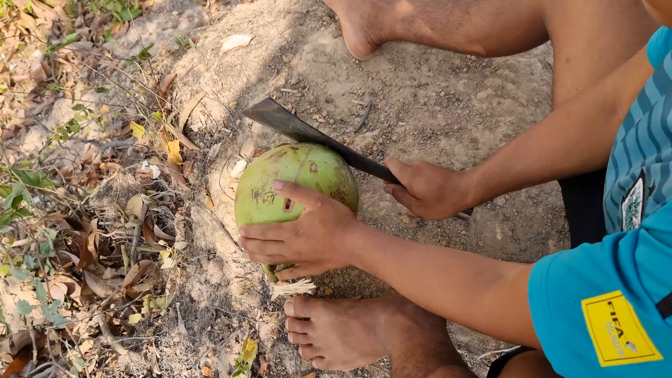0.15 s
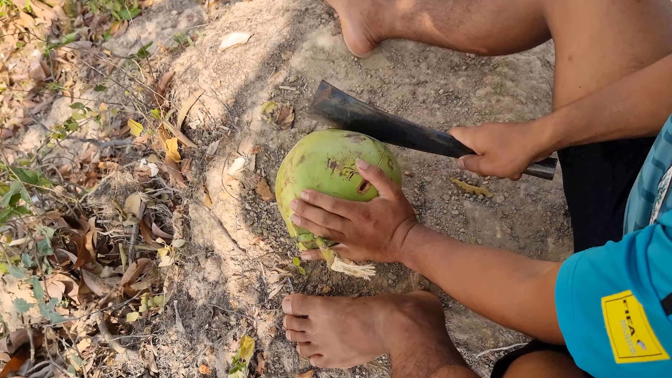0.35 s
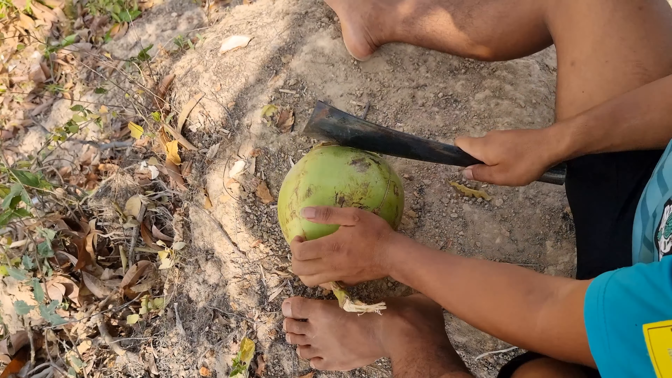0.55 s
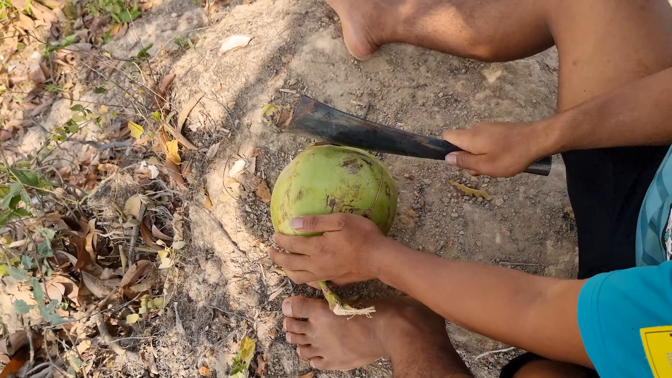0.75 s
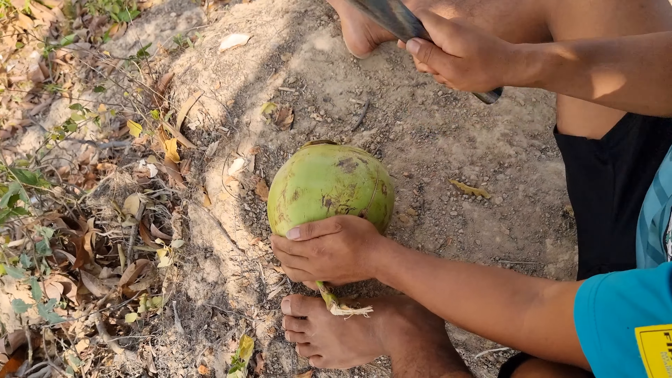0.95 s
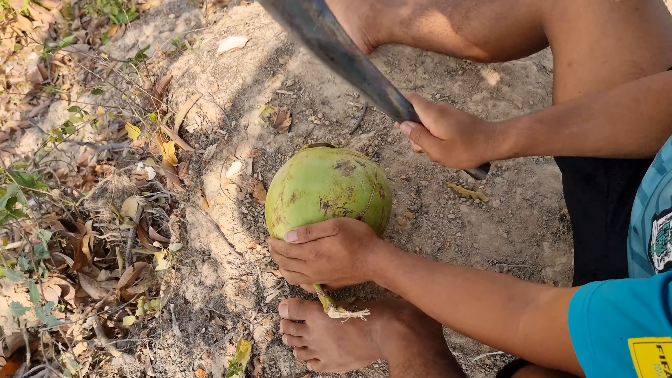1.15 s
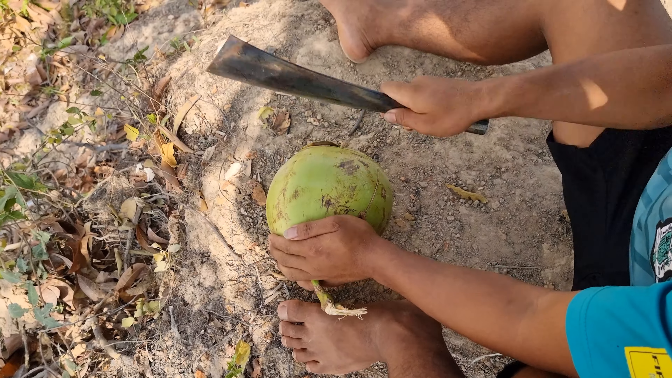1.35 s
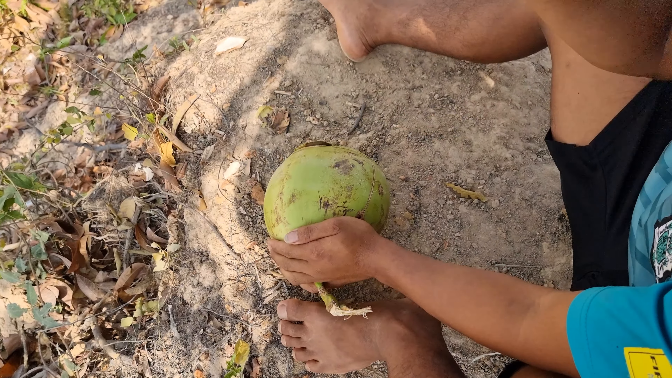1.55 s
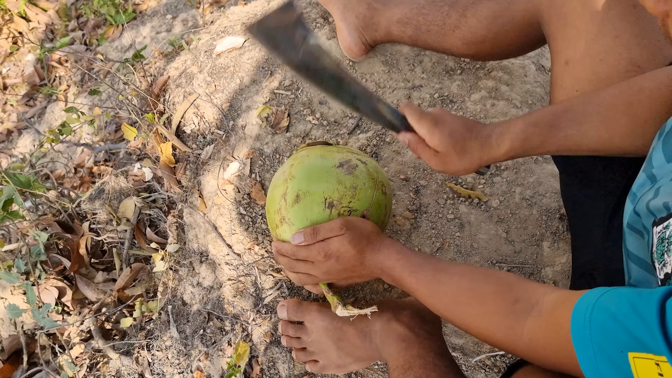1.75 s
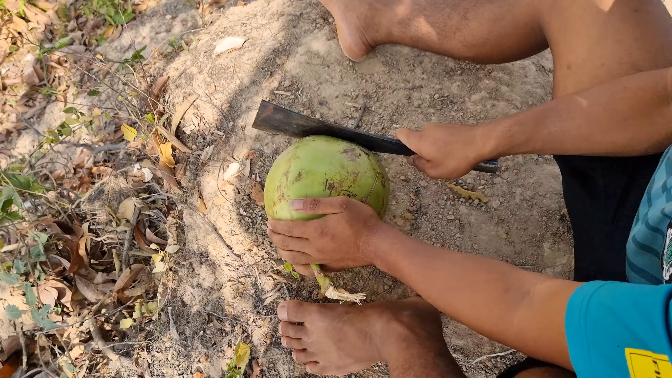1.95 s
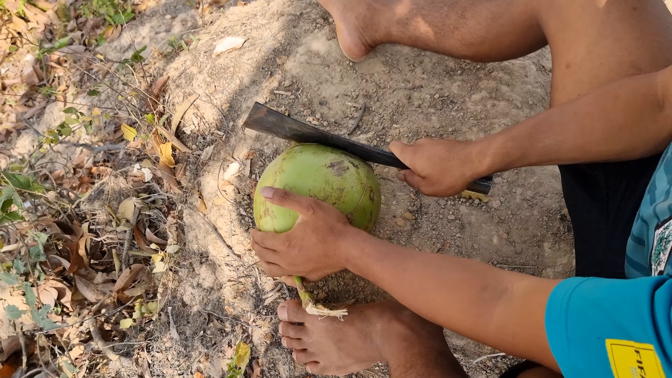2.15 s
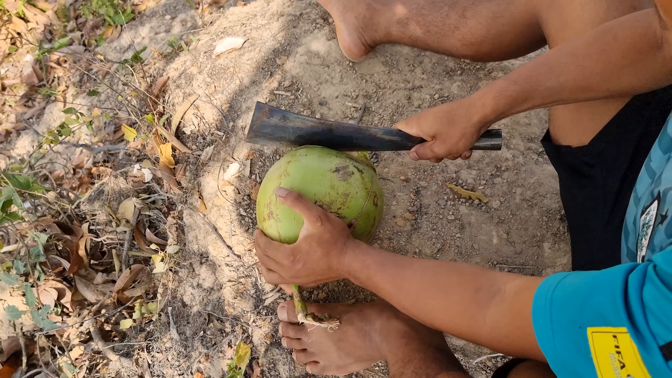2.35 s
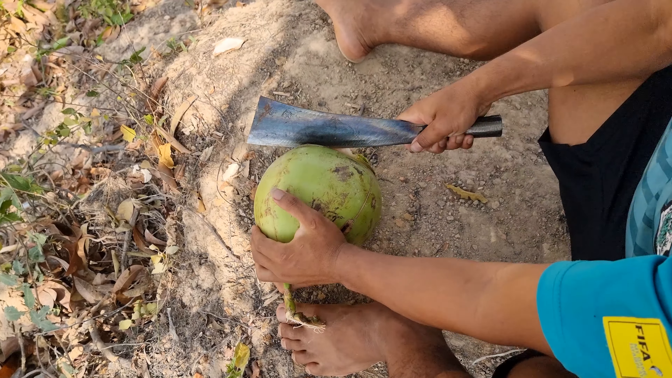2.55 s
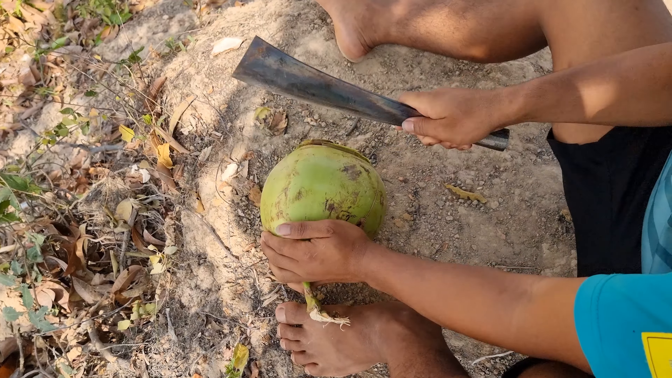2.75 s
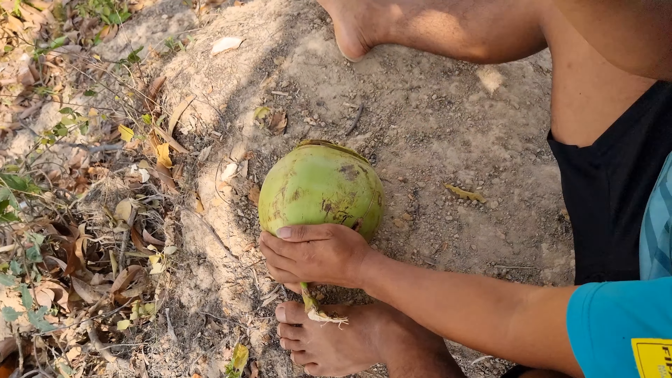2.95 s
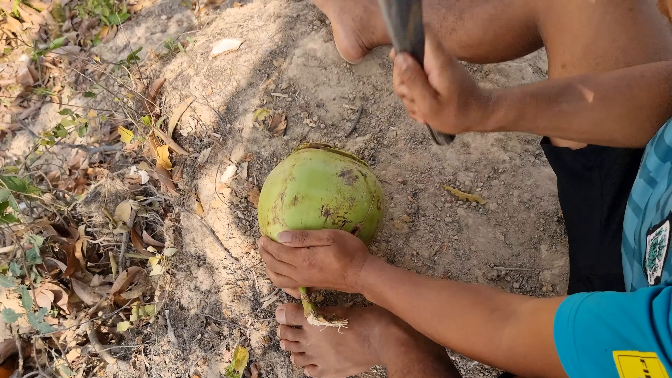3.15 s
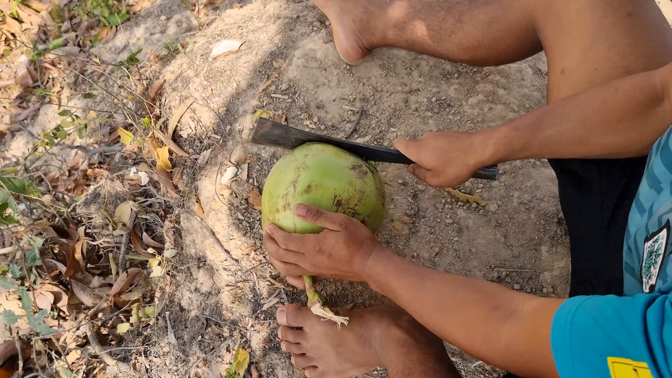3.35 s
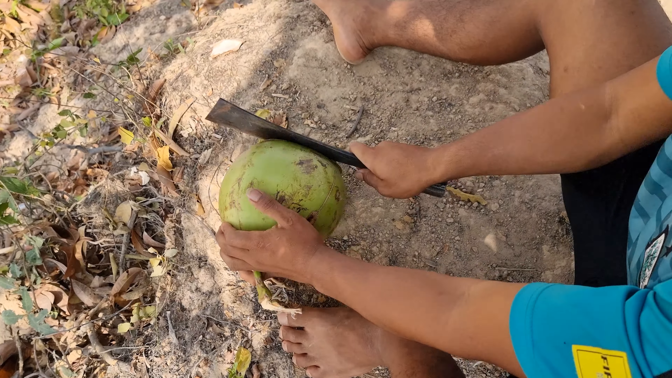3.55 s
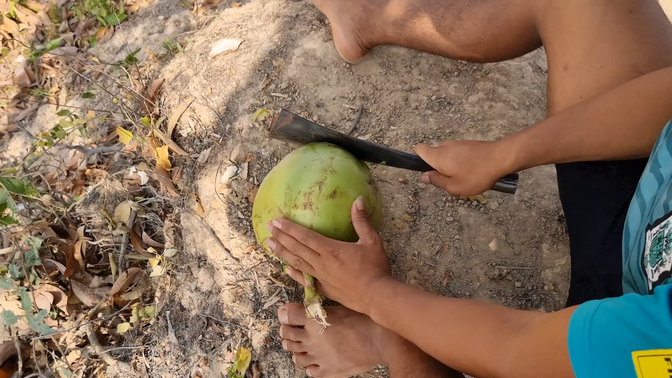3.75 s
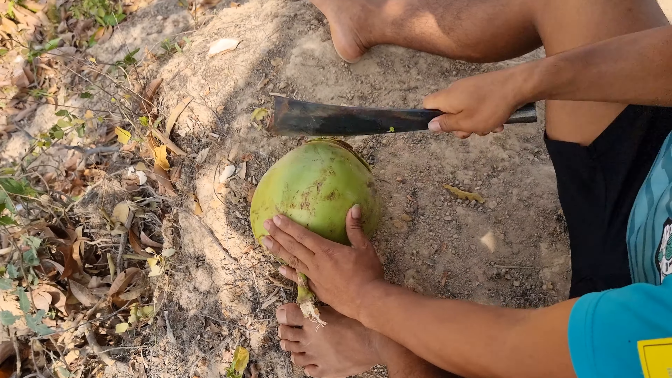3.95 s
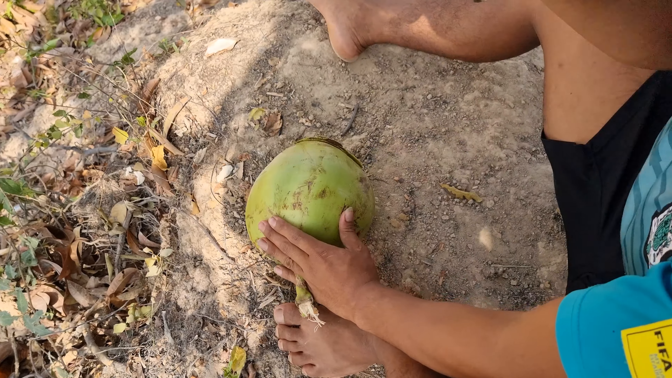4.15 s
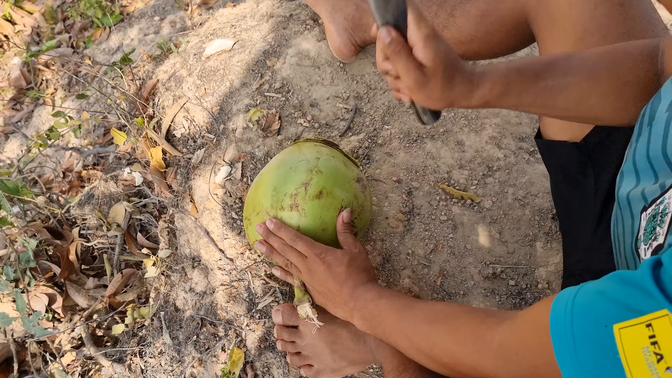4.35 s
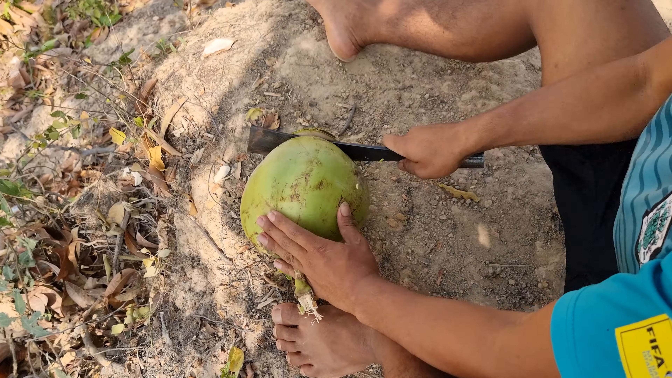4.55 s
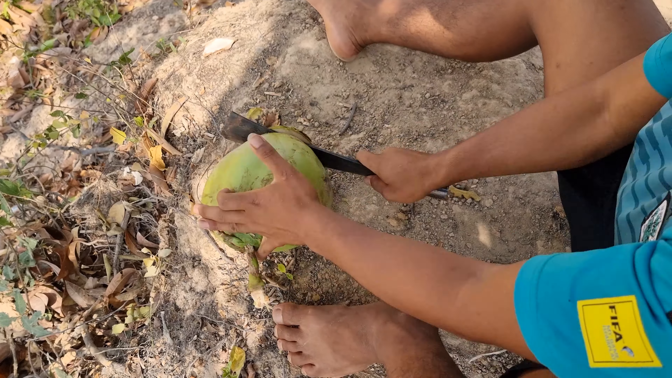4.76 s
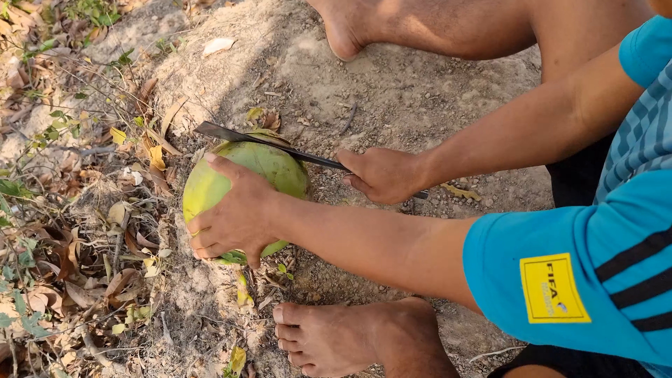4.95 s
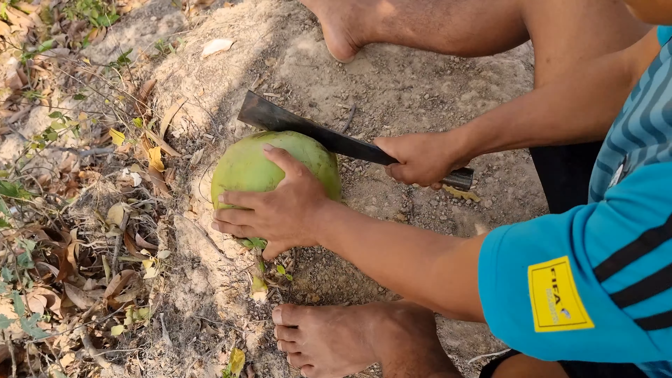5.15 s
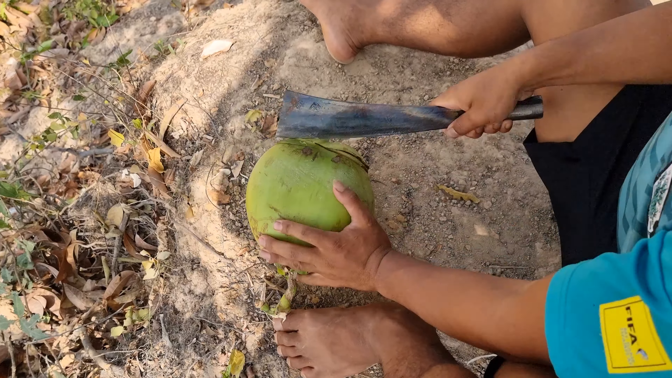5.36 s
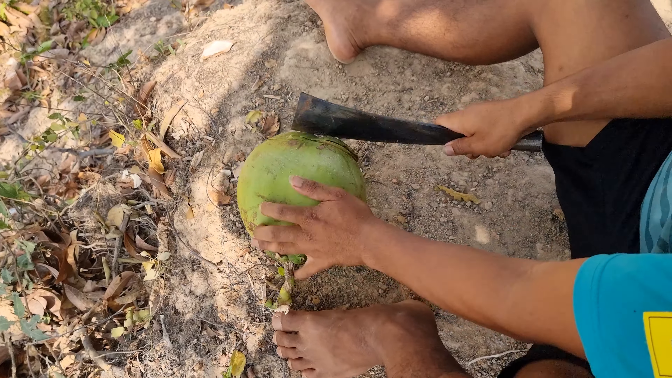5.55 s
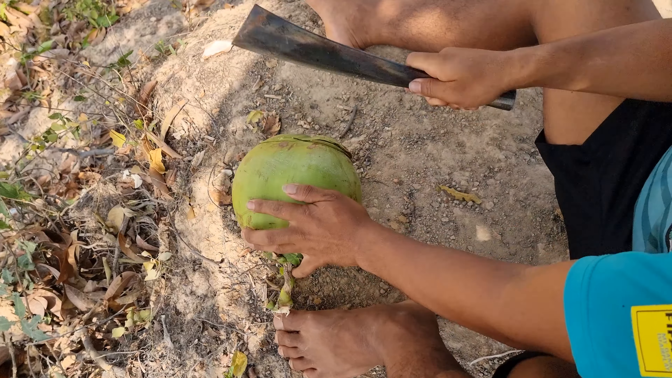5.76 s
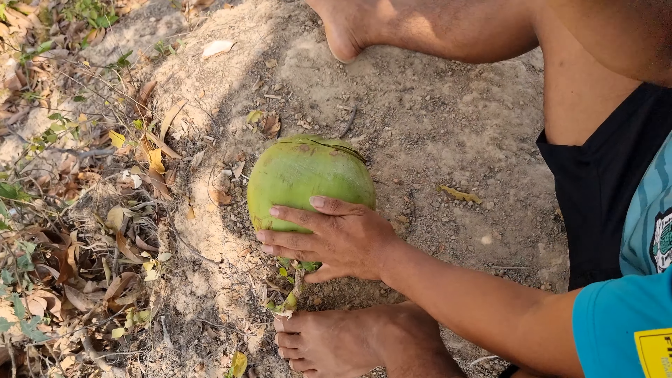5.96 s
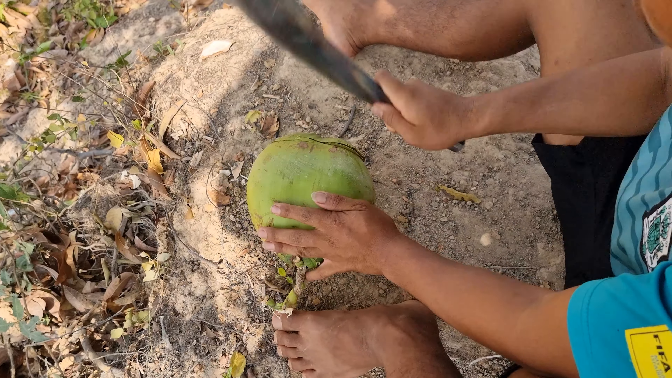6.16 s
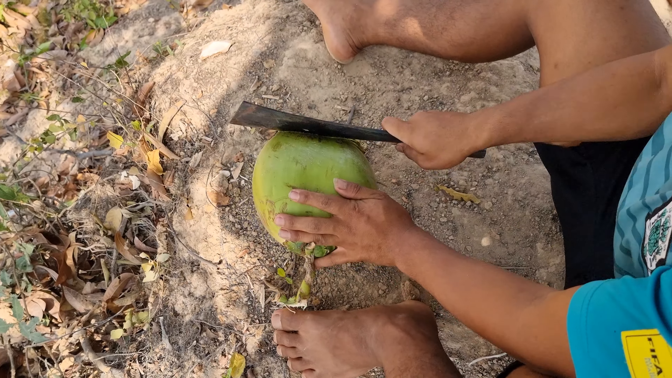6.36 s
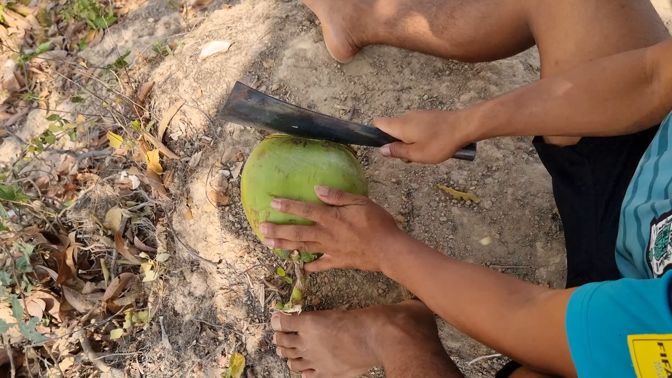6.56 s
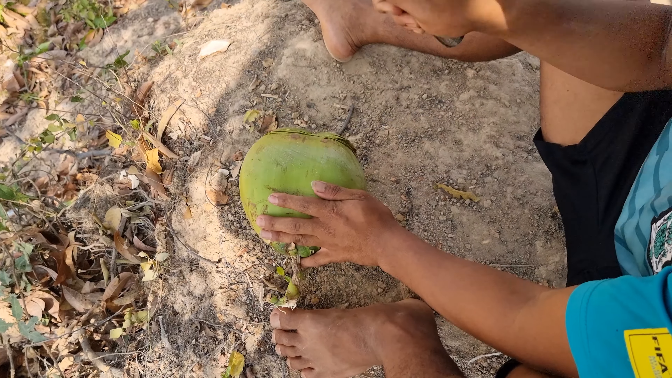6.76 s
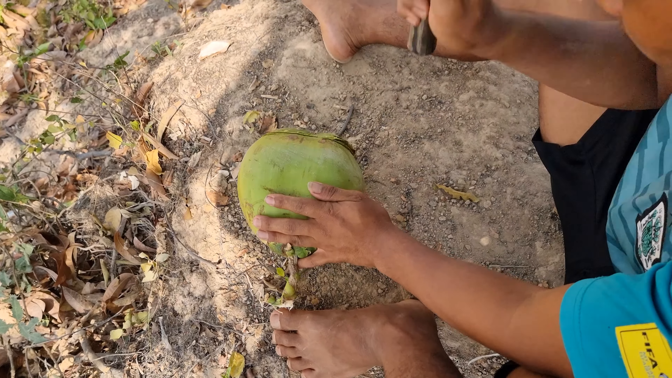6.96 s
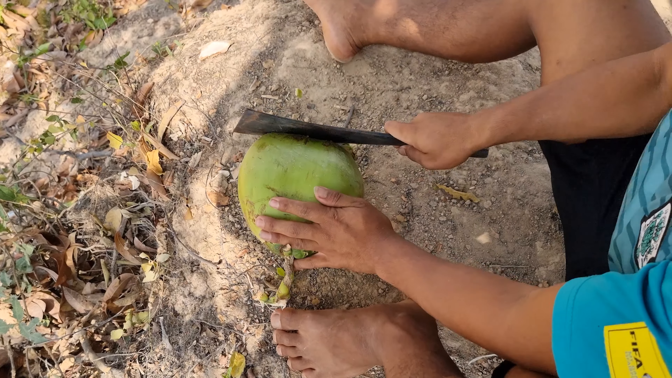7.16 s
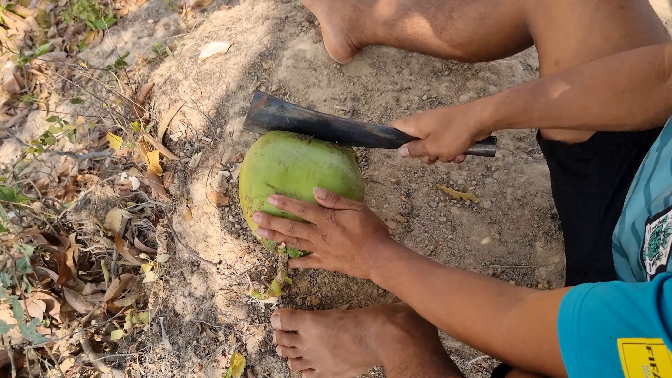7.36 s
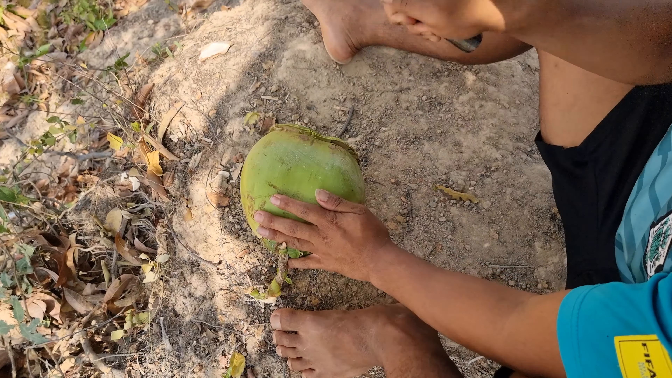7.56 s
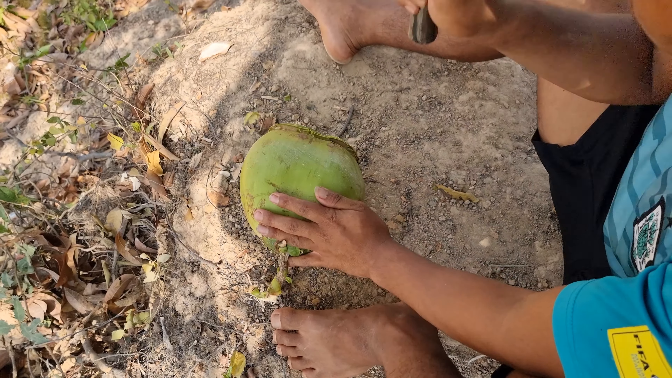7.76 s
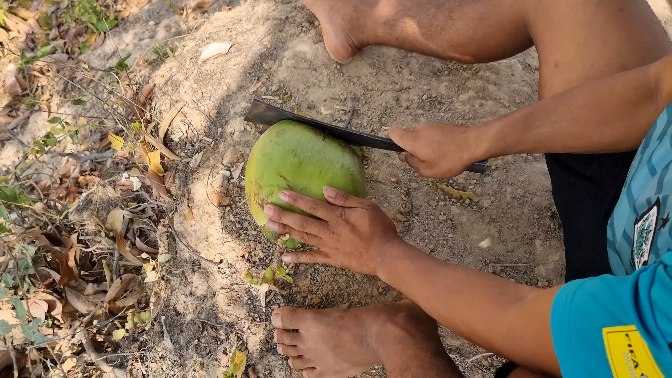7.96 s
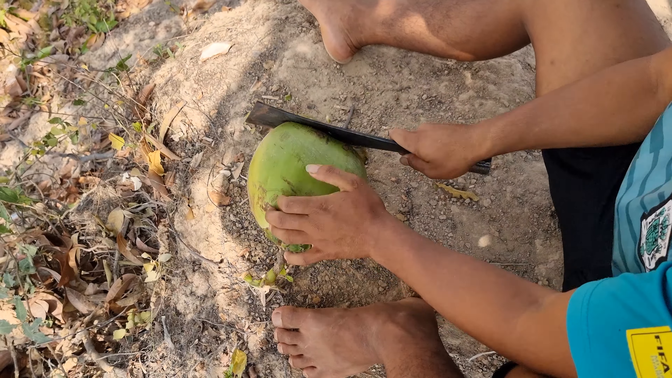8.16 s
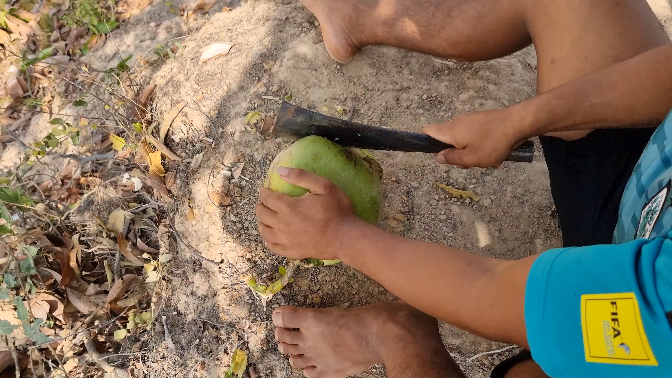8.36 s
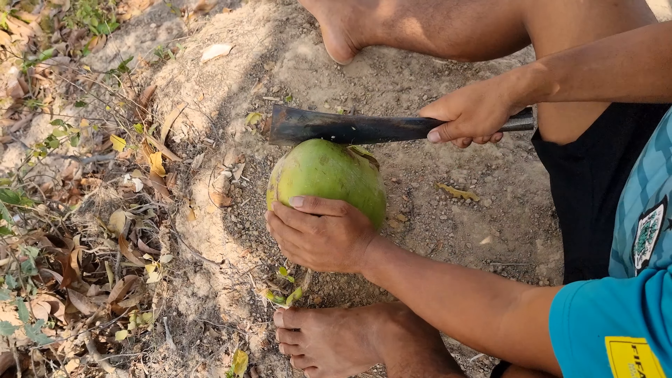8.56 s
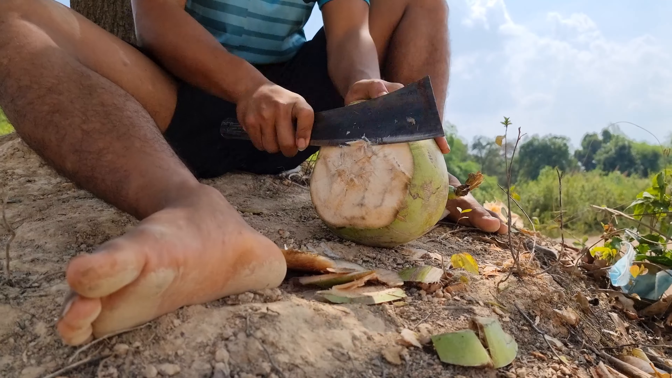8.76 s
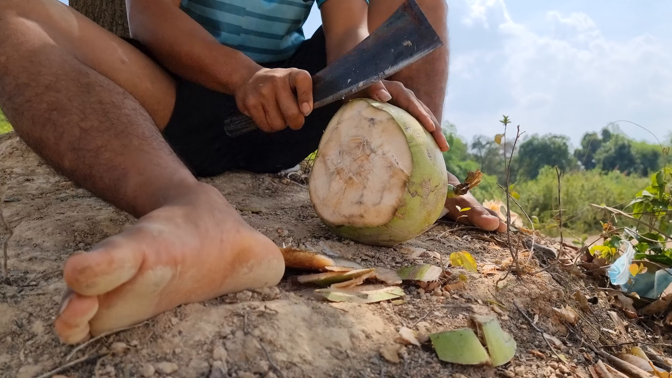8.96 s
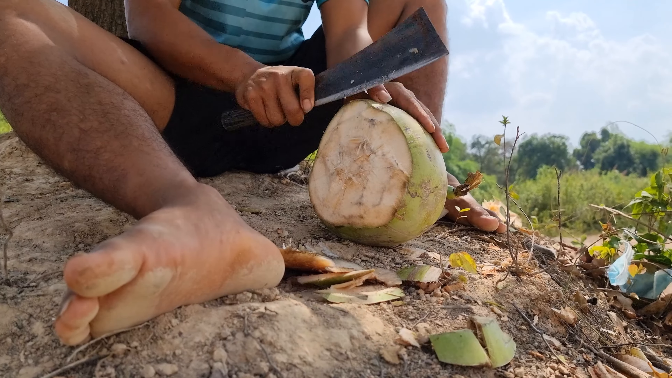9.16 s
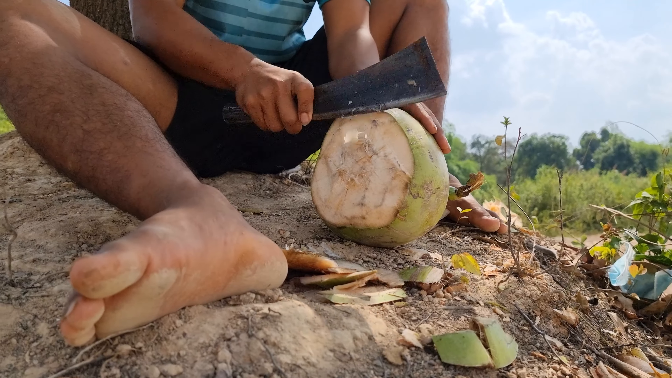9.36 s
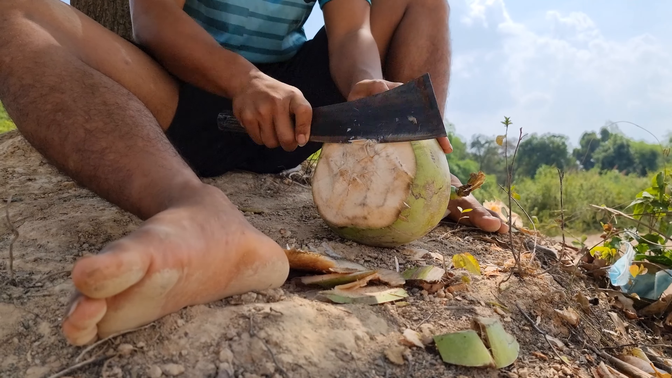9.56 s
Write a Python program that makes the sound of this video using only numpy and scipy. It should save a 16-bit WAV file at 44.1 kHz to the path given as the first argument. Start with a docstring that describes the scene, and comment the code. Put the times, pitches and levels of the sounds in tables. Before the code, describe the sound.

Close stereo, open air, no room echo. Wind rumbles and thumps on the microphone, stronger left, over faint hush and dry leaf ticks. From 0 to 0.8 s a blade creaks and rasps in wet husk. A loud crunchy chop with hollow knock and earth thud lands at 1.2 s, another at 1.8. Snaps and scraping follow at 2.3-2.7. Chops hit at 3.2 and 4.4, each followed by fibrous creaks, little squeaks and steel sliding, busiest around 4.6-5.5 as the wind drops away. A small tear comes at 5.8, then hard blows at 6.2, 7.1 and 7.9. Wind returns from 6.5; a small bird gives buzzy rising chirps from 6.7 to 8.5. Prising creaks at 8.3. Total silence at 8.58-8.67, then a windier, fluttering spot: lighter, brighter cuts at 8.84, 9.1, 9.3 and 9.6, with one thin bird whistle at 9.0.

```python
"""On bare earth beside a pond, a machete chops a green coconut.
Each blow is noise for the torn husk and the edge, resonances for the nut, decaying sines for the blade,
a low swing for the ground and a short, unsteady tone. Between blows, friction noise prises the blade loose.
Filtered noise makes the wind on the microphone, the air and the leaves; gliding tones make a small bird.
After a short silence, lighter and quicker cuts follow from a windier spot."""
import sys
import numpy as np
from scipy import signal
from scipy.fft import rfft, irfft, next_fast_len
from scipy.io import wavfile
from scipy.ndimage import uniform_filter1d

SR = 44100
rng = np.random.default_rng(int(sys.argv[2]) if len(sys.argv) > 2 else 0)


def wav_record(signal):
    """Record a signal, one row per channel, as 16-bit PCM in the file named by sys.argv[1]."""
    frames = np.transpose(np.atleast_2d(signal))
    bounded = np.clip(frames, -1, 1)
    # unit amplitude maps onto the largest positive 16-bit level
    quanta = np.round(bounded * 32767).astype(np.int16)
    wavfile.write(sys.argv[1], SR, quanta)


N = 423801  # length of the sound [samples]


def from_db(db):
    """Turn decibels into a plain factor."""
    return 10 ** (np.asarray(db) / 20)


def rms_one(x):
    """Scale to an average strength (rms) of 1."""
    return x / np.sqrt(np.mean(x ** 2) + 1e-20)


def seconds():
    """The time of every sample [s]."""
    return np.arange(N) / SR


def first_spot():
    return seconds() < np.mean(SILENCE)


def in_time(rows, outside=None):
    """Draw straight lines between the points of each column, one value per sample."""
    s, *columns = np.transpose(rows)
    return [np.interp(seconds(), s, column, outside, outside) for column in columns]


def decay(t, t60):
    """Fade by 60 dB in t60 seconds."""
    return np.exp(-np.log(1000) * t / t60)


def drift(rate, size):
    """Smooth random wandering with rms 1; a higher rate [Hz] wanders faster."""
    knots = rng.standard_normal(size // 8 + 4000)  # one knot every 8 samples
    r = np.exp(-16 * np.pi * rate / SR)
    slow = signal.lfilter([1], [1, -2 * r, r * r], knots)[3990:]  # skip the start-up of the filter
    return np.interp(np.arange(size) / 8, np.arange(len(slow)), rms_one(slow))


def colour(x, spectrum, size=4096):
    """Causal (minimum-phase) filter with the shape of a spectrum; white noise keeps its level."""
    hz, db = np.transpose(spectrum)
    f = np.fft.rfftfreq(size, 1 / SR)
    gain = rms_one(from_db(np.interp(np.log(f + 1), np.log(hz), db)))
    # folding the cepstrum puts the energy as early as possible
    cepstrum = irfft(np.log(gain))
    cepstrum[1:size // 2] *= 2
    cepstrum[size // 2 + 1:] = 0
    impulse = irfft(np.exp(rfft(cepstrum)))
    return signal.oaconvolve(x, impulse[None], axes=-1)[:, :N]


def resonate(x, hz, width_hz):
    """A resonance lets one band through, with gain 1 at its top."""
    r = np.exp(-np.pi * width_hz / SR)
    top = np.array([1, 0, -1]) * (1 - r * r) / 2
    return signal.lfilter(top, [1, -2 * r * np.cos(2 * np.pi * hz / SR), r * r], x + 1e-18)


def grains(apart, rough_db, rate=400):
    """Stereo noise that crackles in clumps; 'apart' is the part the two ports do not share."""
    mid, side = rng.standard_normal((2, N))
    stereo = mid + apart * side * [[1], [-1]]
    return rms_one(stereo * from_db(rough_db * np.clip(drift(rate, N), -2, 2)))


def bursts(times, holds, levels_db, t60, rise_s=.001):
    """Envelopes that reach full level at the given times, hold, then die away."""
    out, t = np.zeros(N + SR), np.arange(SR // 4) / SR - rise_s
    entry = np.minimum(1 + t / rise_s, 1) ** 2
    for s, hold, db in zip(times, holds, levels_db):
        at = int((s - rise_s) * SR)
        out[at:at + len(t)] += from_db(db) * entry * decay(np.maximum(t - hold, 0), t60)
    return out[:N]


def pops(per_s, spread_db, t60):
    """Lone, tiny cracks at random moments, a few much stronger than the rest; rms 1."""
    chance, size = rng.random((2, N))
    clicks = (chance < per_s / SR) * from_db(spread_db * size ** 2)
    t = np.arange(SR // 50) / SR
    envelope = signal.oaconvolve(clicks, decay(t, t60))[:N]
    return rms_one(envelope * grains(apart=0.75, rough_db=0.0))


def scatter(x, t60, low_cut_hz):
    """A brief diffuse tail from ground, legs and leaves, about as strong as the direct sound."""
    t = np.arange(SR // 3) / SR
    tail = rng.standard_normal((2, len(t))) * decay(t, t60) * (t > .003)
    low_cut = signal.butter(1, low_cut_hz, "high", fs=SR, output="sos")
    tail = signal.sosfilt(low_cut, tail + 0.39 * tail[::-1])
    return signal.oaconvolve(x, rms_one(tail) / np.sqrt(len(t)), axes=-1)[:, :N]


# how loud the left microphone port is against the right: (frequency [Hz], left minus right [dB])
PORT_BALANCE = [(100, 0.5), (500, -3), (1000, 0), (2200, 2.5), (4000, -7.5), (6000, 0.5), (8500, -7),
                (12500, -9)]


def at_ports(x, lag_s=.000025):
    """Near sounds reach the left port first; the balance of the two ports changes with pitch."""
    hz, db = np.transpose(PORT_BALANCE)
    size = next_fast_len(N + SR // 10)
    f = np.fft.rfftfreq(size, 1 / SR)
    tilt = from_db(np.interp(np.log(f + 1), np.log(hz), db) / 2 * [[1], [-1]])
    lag = np.exp(-2j * np.pi * f * lag_s * [[0], [1]])
    return irfft(rfft(x, size) * tilt * lag, size)[:, :N]


# spectrum of the outdoor hush at the first spot: (frequency [Hz], relative level [dB])
FIRST_AIR = [(100, -2), (234, -6), (452, -8.5), (595, -2.5), (740, -2), (950, -15.5), (1280, -10),
             (1600, -17), (2300, -15.5), (4400, -17.5), (5300, -28), (9000, -32), (10500, -38),
             (16000, -34.5)]
# the same at the second spot: (frequency [Hz], relative level [dB])
SHORE_AIR = [(100, -3), (700, -8), (1500, -8), (4000, -9.5), (7500, -17), (8800, -24.5), (15500, -24)]


def air():
    """Distant outdoor hush: steady noise, with a spectrum of its own at each spot."""
    first = from_db(-44.5) * colour(grains(apart=1.0, rough_db=1.36), FIRST_AIR)
    second = from_db(-47.0) * colour(grains(apart=0.99, rough_db=1.0), SHORE_AIR)
    return np.where(first_spot(), first, second)


# spectrum of the deep wind rumble: (frequency [Hz], relative level [dB])
RUMBLE = [(12, -26), (25, -11), (45, -3), (68, 1), (95, -5), (130, -14.5), (200, -32.5), (400, -50.5),
          (1500, -88.5)]
# spectrum of the higher wind flutter: (frequency [Hz], relative level [dB])
FLUTTER = [(40, -18), (110, 2), (180, -2), (280, -8), (420, -16), (700, -31), (1500, -57.5), (6000, -73.5)]
# strength of the breeze, which falls to a lull and returns: (time [s], relative level [dB])
BREEZE = [(0.0, -28.5), (0.48, -31), (0.69, -26), (1.05, -32.5), (2.0, -24), (2.67, -33), (3.2, -26.5),
          (3.6, -32.5), (4.46, -31), (4.68, -30.5), (4.92, -47.5), (6.16, -63), (6.54, -38.5), (6.8, -28.5),
          (7.52, -32), (8.23, -29.5), (8.38, -28), (8.57, -27)]
# wind at the second spot: (time [s], relative rumble level [dB], relative flutter level [dB])
SHORE_WIND = [(8.68, -25, -38), (8.938, -21.5, -38.5), (9.452, -24.5, -23.5), (9.6, -26, -23.5)]
BREEZE_RUMBLE_DB, BREEZE_FLUTTER_DB = 7, -8  # added to the breeze
BREEZE_PAN_DB = 12  # it blows from the left, so the right port is sheltered
SHORE_RUMBLE_DB, SHORE_FLUTTER_DB = 5.5, 10  # added to the shore wind, which meets both ports
CALM_RUMBLE_DB, CALM_FLUTTER_DB = -40, -47  # what remains in a lull


def wind():
    """Eddies strike the ports as rumble and flutter, which swell together in the first breeze."""
    breeze_db, = in_time(BREEZE)
    shore_rumble_db, shore_flutter_db = in_time(SHORE_WIND)
    first = first_spot()
    sides = from_db(BREEZE_PAN_DB / 2 * np.array([[1], [-1]]))
    breeze = from_db(breeze_db) * rms_one(sides)
    shore_rumble = from_db(SHORE_RUMBLE_DB + shore_rumble_db)
    shore_flutter = from_db(SHORE_FLUTTER_DB + shore_flutter_db)
    rumble = np.where(first, from_db(BREEZE_RUMBLE_DB) * breeze, shore_rumble)
    flutter = np.where(first, from_db(BREEZE_FLUTTER_DB) * breeze, shore_flutter)
    # the calm remainder adds as power
    rumble = np.hypot(rumble, from_db(CALM_RUMBLE_DB))
    flutter = np.hypot(flutter, from_db(CALM_FLUTTER_DB))
    return (rumble * colour(grains(apart=0.9, rough_db=2.67, rate=4.7), RUMBLE)
            + flutter * colour(grains(apart=1.0, rough_db=4.0, rate=30), FLUTTER))


# single eddies that buffet the ports:
# (middle [s], length [s], thump level [dB], flutter level [dB], left minus right [dB])
BUFFETS = [(0.077, 0.12, -12.5, -36, 11), (0.617, 0.072, -15.5, -21.5, -5.5),
           (0.806, 0.071, -18.5, -34, 16), (1.515, 0.076, -32, -24, 10), (1.655, 0.052, -38, -25, 8),
           (1.736, 0.055, -26, -29, 5), (1.848, 0.09, -13.5, -29, -15), (2.129, 0.063, -8, -31, 11),
           (2.396, 0.065, -25, -24.5, 8), (2.538, 0.093, -9.5, -36, 4.5), (3.076, 0.086, -15, -38, 11),
           (3.354, 0.085, -17.5, -32, 10), (3.758, 0.076, -15.5, -39, 12), (4.199, 0.13, -15, -35, 10),
           (4.735, 0.098, -16.5, -36, -16), (6.673, .08, -18.5, -40, 13), (6.858, 0.15, -16.5, -49, 4),
           (7.547, 0.065, -23, -34, 9), (7.75, 0.045, -24, -35, 19), (7.216, 0.05, -10, -20, 14),
           (8.254, 0.12, -6, -30.5, 7.5), (8.48, 0.14, -14.5, -49, 14), (8.56, 0.073, -6.5, -30, 10),
           (8.88, 0.062, -29, -15.5, -3), (8.934, 0.06, -10, -17, 5), (9.43, 0.12, -10, -19, 2),
           (9.559, 0.017, -26, -14.5, 2)]


def buffets():
    """A single eddy swells and dies on the ports within a fraction of a second."""
    thump, flutter = np.zeros((2, 2, N + SR))
    for s, length, thump_db, flutter_db, pan_db in BUFFETS:
        sides = from_db(pan_db / 2 * np.array([[1], [-1]]))
        swell = rms_one(sides) * np.hanning(int(length * SR))
        at = max(int((s - length / 2) * SR), 0)
        thump[:, at:at + swell.shape[1]] += from_db(thump_db) * swell
        flutter[:, at:at + swell.shape[1]] += from_db(flutter_db) * swell
    eddy = grains(apart=0.92, rough_db=1.0)
    return thump[:, :N] * colour(eddy, RUMBLE) + flutter[:, :N] * colour(eddy, FLUTTER)


def leaves():
    """Dry leaves tick faintly on the bare earth, following the breeze at the first spot."""
    breeze_db, = in_time(BREEZE, outside=-120)
    ticks = pops(per_s=8, spread_db=7.5, t60=0.012)
    return colour(from_db(breeze_db - 29.5) * ticks, CREAK)


# bird calls: (start [s], length [s], first pitch [Hz], last pitch [Hz], buzz [0-1], relative level [dB])
BIRD_CALLS = [(6.72, 0.11, 2820, 2250, .05, -52), (6.787, 0.17, 3600, 4320, 0.95, -42.5),
              (7.121, 0.12, 3700, 4390, 1, -41.5), (7.427, 0.14, 3740, 4400, 1, -40.5),
              (7.752, 0.17, 3640, 4420, 1, -38.5), (7.836, 0.071, 2810, 2610, 0.2, -38),
              (8.056, .145, 3570, 4370, 0.85, -40), (8.398, 0.14, 3850, 4350, 0.94, -45),
              (9.002, 0.092, 4330, 3760, .05, -44)]


def bird(buzz_rate=160):
    """Slurred whistles; the rising ones break into a ragged buzz as they level off."""
    out = np.zeros(N + SR)
    for s, length, start_hz, end_hz, buzz, db in BIRD_CALLS:
        u = np.linspace(0, 1, int(length * SR))
        buzz_hz = buzz_rate * rng.uniform(.85, 1.15)
        wobble_hz = 300 * np.sin(2 * np.pi * buzz_hz * length * u) + 130 * drift(500, len(u))
        slur = start_hz + (end_hz - start_hz) * np.sin(u * np.pi / 2)
        pitch = slur + buzz * np.minimum(2 * u, 1) ** 2 * wobble_hz
        swell = np.abs(np.sin(np.pi * u ** 1.74)) ** .5 * from_db(2 * drift(60, len(u)))
        whistle = np.sin(2 * np.pi * np.cumsum(pitch) / SR)
        out[int(s * SR):int(s * SR) + len(u)] += from_db(db) * swell * whistle
    return out[:N] * from_db([[-1.5], [2.5]])  # a little to the right


# pushes and pulls on the blade in the cut: (start [s], length [s], husk creak level [dB],
# fibre rasp level [dB], steel slide level [dB], relative steel ring level [dB])
STROKES = [(0.0, .13, -41.5, -49.5, -56.5, -84), (0.072, 0.23, -41.5, -39, -43, -54),
           (0.403, 0.076, -51, -49, -62.5, -58), (0.513, 0.098, -47.5, -55, -53, -56),
           (0.617, 0.2, -51.5, -52.5, -62, -65), (1.957, 0.092, -48.5, -54, -54, -62),
           (2.259, 0.092, -42.5, -37.5, -37, -61), (2.373, 0.14, -39.5, -43.5, -43.5, -60),
           (2.629, 0.096, -49, -50, -52.5, -56), (2.736, 0.091, -56, -59.5, -58.5, -69),
           (3.368, 0.061, -47, -47.5, -53.5, -72), (3.436, 0.041, -37, -39, -39, -53),
           (3.486, 0.015, -40, -36, -29, -36), (3.543, 0.019, -30, -39, -78, -77),
           (3.655, 0.14, -46.5, -40.5, -42.5, -55), (3.839, 0.02, -46, -38, -37, -44),
           (3.88, 0.11, -56, -44, -46, -53), (4.621, 0.22, -40.5, -44.5, -61, -80),
           (4.815, 0.097, -38, -45.5, -55, -70), (4.916, .1, -50, -54, -60, -76),
           (5.037, 0.077, -39, -47.5, -49, -59), (5.082, 0.078, -48, -33.5, -37.5, -49),
           (5.139, 0.14, -47, -34.5, -39, -48.5), (5.293, 0.035, -35, -28.5, -30, -31.5),
           (5.38, 0.048, -46, -35.5, -37, -36.5), (5.439, 0.069, -40.5, -46, -35, -41.5),
           (5.758, 0.069, -51, -49, -39, -60), (6.462, 0.064, -49.5, -40, -41, -61),
           (6.565, 0.043, -64, -55, -47.5, -51), (6.665, 0.097, -68, -59, -60, -70),
           (7.202, 0.066, -61, -55, -52.5, -67), (7.352, 0.076, -57, -45, -47.5, -53.5),
           (8.221, 0.12, -47, -43, -51, -63), (8.337, 0.055, -34.5, -35, -36, -53),
           (8.431, 0.15, -51, -47.5, -50, -68)]


def strokes(levels_db, build_share=0.61, release_t60=0.14):
    """Each stroke builds with the pressure of the hand, holds, and dies away as the hand eases off."""
    out, t = np.zeros(N + SR), np.arange(SR // 2) / SR
    for (s, length, *_), db in zip(STROKES, levels_db):
        build = np.sin(np.pi / 2 * np.minimum(t / (build_share * length), 1)) ** 2
        release = decay(np.maximum(t - length, 0), release_t60)
        out[int(s * SR):int(s * SR) + len(t)] += from_db(db) * build * release
    return out[:N]


# spectrum of the creaking husk: (frequency [Hz], relative level [dB])
CREAK = [(200, -29), (600, -0.5), (1100, 2), (1500, -3.5), (2200, -6), (4000, -19), (15000, -45.5)]
# spectrum of the rasping fibres: (frequency [Hz], relative level [dB])
RASP = [(400, -38), (1400, -13.5), (2300, -4), (3200, 4.5), (4200, -0.5), (5200, -20.5), (15000, -32.5)]
# modes of the blade while it slides in the cut: (frequency [Hz], width [Hz], gain [dB])
SLIDE_MODES = [(2545, 61, 22), (3870, 49, 18), (4570, 140, 15.5), (5820, 110, 14.5), (6660, 58.3, 21.5),
               (8000, 54, 19), (9080, 95, 13.5), (11300, 95, 6), (12500, 60, 15), (13100, 68, 12),
               (14100, 61, 15)]


def prising():
    """The wedged blade creaks, rasps and sings as it slides out; its grip sticks and slips."""
    grip = rms_one(from_db(1.1 * drift(45, N)))
    creak, rasp, slide, ring = (grip * strokes(db) for db in np.transpose(STROKES)[2:])
    # single fibres that let go during a stroke
    snapping = from_db(-4.5) * pops(per_s=29, spread_db=11.5, t60=0.014)
    creaking = rms_one(grains(apart=0.86, rough_db=3.0, rate=174) + snapping)
    rasping = rms_one(grains(apart=0.75, rough_db=1.5, rate=150) + snapping)
    husk = colour(creak * creaking, CREAK)
    fibres = colour(rasp * rasping, RASP)
    friction = grains(apart=1.0, rough_db=4.5, rate=350)
    steel = sum(from_db(db) * resonate(ring * friction, hz, width) for hz, width, db in SLIDE_MODES)
    return husk + fibres + colour(slide * friction, EDGE) + steel


# wet husk squeaking on the steel:
# (start [s], length [s], first pitch [Hz], last pitch [Hz], middle level before roughness [dB])
SQUEAKS = [(1.867, 0.0066, 4300, 3800, -15), (1.872, 0.0102, 3080, 2720, -31),
           (2.395, 0.0068, 980, 1470, -29), (2.538, 0.013, 1030, 1080, -37),
           (3.464, 0.02, 2320, 1660, -23.5), (3.55, 0.023, 1430, 890, -37),
           (3.852, 0.019, 3470, 3410, -22.5), (4.493, 0.0094, 3290, 2740, -9.5),
           (4.796, 0.034, 1270, 1173, -32.5), (4.878, 0.045, 1232, 1290, -30.5),
           (5.12, 0.015, 1446, 2020, -23.5), (5.404, 0.052, 1120, 1050, -37.5),
           (5.563, 0.035, 934, 1146, -33.5)]


def squeaks(jitter=0.11, rough_db=2.0):
    """Stick and slip: short, ragged notes that glide as the grip changes."""
    out = np.zeros(N + SR)
    for s, length, start_hz, end_hz, db in SQUEAKS:
        u = np.linspace(0, 1, int(length * SR))
        glide = start_hz + (end_hz - start_hz) * u
        pitch = glide * (1 + jitter * drift(600, len(u)))
        swell = np.sin(np.pi * u) * from_db(db + rough_db * drift(300, len(u)))
        out[int(s * SR):int(s * SR) + len(u)] += swell * np.sin(2 * np.pi * np.cumsum(pitch) / SR)
    return out[:N]


# modes of the steel: (frequency [Hz], relative level [dB], time to fade by 60 dB [s])
BLADE_MODES = [(1220, -9, 0.14), (1800, 4.5, .1), (2610, -10.5, 0.14), (3100, -16.5, 0.055),
               (3350, -5.5, .08), (3820, -13, 0.14), (4400, 0, 0.16), (6000, -14.5, .1),
               (7030, -13.5, 0.17), (7990, -2, 0.11), (9330, -4, 0.084), (11330, -20, .06), (12450, 3, .15),
               (13900, 5, .05), (15400, -2.5, 0.06)]


def blade(strikes):
    """The steel rings in its modes; a unit click gives sines of the listed heights."""
    out = 0
    for hz, db, t60 in BLADE_MODES:
        r, w = decay(1 / SR, t60), 2 * np.pi * hz / SR
        ring = signal.lfilter([0, np.sin(w)], [1, -2 * r * np.cos(w), r * r], strikes + 1e-18)
        out = out + from_db(db) * ring
    return out


# small snaps, taps and dull ticks: (time [s], low level [dB], middle level [dB], high level [dB])
SNAPS = [(.039, -33, -44, -47), (0.097, -31.5, -42, -55), (.455, -41, -37.5, -35.5), (.476, -42, -37, -34),
         (0.585, -33, -34.5, -28.5), (0.931, -36.5, -59, -66), (1.714, -41, -39, -44.5),
         (1.87, -38, -26.5, -24.5), (2.308, -36, -23.5, -26), (2.354, -38, -22, -25),
         (2.452, -28.5, -23, -27), (2.47, -55, -20, -21), (2.48, -36, -29, -27), (2.508, -47, -27, -24.5),
         (2.855, -56, -53, -52), (3.470, -34, -21, -37), (3.857, -41, -36, -28), (5.033, -57, -39, -25.5),
         (5.1222, -35, -18, -34), (5.133, -49, -16.5, -31.5), (5.231, -52, -24, -44),
         (5.309, -39, -25, -26), (5.785, -38, -26, -27), (6.268, -32, -20.5, -23), (6.535, -35, -24.5, -29),
         (7.237, -51, -41.5, -49), (7.318, -42, -49, -61.5), (7.798, -44, -54, -73), (7.966, -46, -30, -39),
         (8.392, -39, -25, -34)]


def snaps():
    """Small snaps, taps and dull ticks are short noise bursts; the bright part also rings the steel."""
    s, low_db, middle_db, high_db = np.transpose(SNAPS)
    hold = np.full(len(s), .003)
    crack = grains(apart=0.85, rough_db=4.0, rate=1100)
    low = crack * bursts(s, hold, low_db, t60=0.0088)
    middle = crack * bursts(s, hold, middle_db, t60=.016)
    high = crack * bursts(s, hold, high_db, t60=0.0094)
    steel = from_db(-43.0) * blade(high.mean(axis=0))
    return colour(low, CREAK) + colour(middle, RASP) + colour(high, EDGE) + steel


def thumps(times, levels_db, hz, rise_s, t60):
    """The nut is driven into the soil and rocks there for a few cycles."""
    out, t = np.zeros(N + SR), np.arange(SR // 4) / SR
    swing = -np.sin(2 * np.pi * hz * t) * (1 - np.exp(-(t / rise_s) ** 2)) * decay(t, t60)
    for s, db in zip(times, levels_db):
        out[int(s * SR):int(s * SR) + len(t)] += from_db(db) * swing / abs(swing).max()
    return out[:N]


def tones(spread_hz=130):
    """Each blow or tear has a brief, unsteady tone at a pitch of its own."""
    out, t = np.zeros(N + SR), np.arange(SR // 10) / SR
    for s, bite, *_, hz, db in CHOPS:
        pitch = hz + spread_hz * np.sqrt(hz / 1000) * drift(400, len(t))  # high tones wander more
        swell = np.minimum(t / 0.0023, 1) * decay(np.maximum(t - bite, 0), .028)
        tone = np.sin(2 * np.pi * np.cumsum(pitch) / SR)
        out[int(s * SR):int(s * SR) + len(t)] += from_db(db) * swell * tone
    return out[:N]


# blows and the smaller tears that follow some of them:
# (time [s], bite length [s], tearing level [dB], relative nut knock level [dB],
# tilt of the knock [dB per octave], edge hiss level [dB], ground thump level [dB],
# relative blade ring level [dB], tone pitch [Hz], tone level [dB])
CHOPS = [(1.2496, 0.0038, -10.5, -8.5, -0.5, -10, -20, -26, 608, -6.5),
         (1.8204, .005, -2.5, -6.5, 0, -6.5, -14, -42, 2783, -5),
         (3.2454, 0.0075, -4.5, -2.5, 0, -5.5, -12, -39, 1154, -7.5),
         (4.449, 0.011, -3, -13, 1.5, -6.5, -13, -42, 1960, -12.5),
         (4.493, .004, -20.5, -40, -4, -21, -41, -51.5, 1100, -15),
         (5.763, 0.008, -28.5, -33, 1.5, -22, -40, -45, 4370, -18),
         (6.2291, 0.0019, -4.5, -5.5, -1, -5.5, -8.5, -36, 711, -9.5),
         (7.0854, 0.0034, -1.5, -8.5, 1.5, -8.5, -15.5, -40, 702, -5.5),
         (7.897, .006, -2, -6.5, 2.5, -9.5, -12, -46, 1074, -7),
         (8.8422, 0.0012, -11, -13.5, -3.5, -17.5, -25, -53, 3740, -13),
         (9.0914, 0.0044, -13.5, -15.5, -0.5, -14, -23, -46, 3406, -12),
         (9.322, 0.0099, -18, -24, 1.5, -18, -29, -37, 3606, -16),
         (9.388, 0.0036, -44, -40, -1, -31, -41, -65, 3730, -27.5),
         (9.602, 0.0026, -19.5, -27, .5, -13, -14, -39, 3450, -6.5)]
# spectrum of the tearing husk: (frequency [Hz], relative level [dB])
TEAR = [(300, -5), (900, -5.5), (1600, -7), (2200, -10), (2700, -2), (3500, -2), (4300, -3.5), (5100, -23),
        (7000, -20.5), (15000, -21)]
# spectrum of the hissing edge: (frequency [Hz], relative level [dB])
EDGE = [(1500, -35.5), (4000, 1), (5300, -2), (6400, 1), (8200, -3), (10000, -4), (13000, -4.5),
        (16000, -2.5)]
# resonances of the nut: (frequency [Hz], width [Hz], gain [dB])
NUT_MODES = [(165, 25, 8.5), (265, 80, 21.5), (386, 40, 9), (514, 100, 10), (713, 80, 18.5),
             (1088, 132, 17.5), (1298, 150, 15), (1892, 230, 9)]
SWELL_S = 0.006  # tearing and hiss swell in over a few milliseconds
KNOCK_PIVOT_HZ = 600  # the knock's tilt turns about this pitch: some sound brighter, some duller


def chops():
    """The edge tears fibres for a few milliseconds, which shakes nut, blade and ground."""
    s, bite, tear_db, knock_db, tilt_db, edge_db, thump_db, ring_db, _, _ = np.transpose(CHOPS)
    tearing = bursts(s, bite, tear_db, t60=0.03, rise_s=SWELL_S)
    hissing = bursts(s, bite, edge_db, t60=.033, rise_s=SWELL_S)
    tear = colour(grains(apart=0.93, rough_db=5.5, rate=610) * tearing, TEAR)
    edge = colour(grains(apart=.6, rough_db=3.5, rate=700) * hissing, EDGE)
    push, knock = grains(apart=.45, rough_db=3.0), 0
    for k, (hz, width, db) in enumerate(NUT_MODES):
        force_db = knock_db + tilt_db * np.log2(hz / KNOCK_PIVOT_HZ)
        force = bursts(s, bite, force_db, t60=0.016)
        # neighbouring resonances swing in opposite directions
        knock = knock + (-1) ** k * from_db(db) * resonate(push * force, hz, width)
    strikes = np.zeros(N)
    strikes[np.minimum((s * SR).astype(int), N - 1)] = from_db(ring_db)
    ground = thumps(s, thump_db, hz=78, rise_s=0.018, t60=0.091)
    return tear + edge + knock + tones() + blade(strikes) + ground


def scene():
    """Near work and the farther bird, each with a diffuse tail, above wind and air."""
    work = chops() + snaps() + squeaks() + prising() + leaves()
    near = at_ports(work + from_db(-11.5) * scatter(work, t60=0.13, low_cut_hz=1300))
    calls = bird()
    far = from_db(-5.5) * calls + from_db(-4.5) * scatter(calls, t60=0.18, low_cut_hz=1000)
    return near + far + wind() + buffets() + air()


# the silence between the two spots: (start [s], end [s])
SILENCE = (8.577, 8.671)
CUTOFF_HZ = 16000


def record(dry):
    """Peaks overload and flatten; the sound stops briefly between the two spots; the top is cut."""
    running = (seconds() < SILENCE[0]) | (seconds() > SILENCE[1])
    gate = uniform_filter1d(running.astype(float), size=64)  # softens the edges of the silence
    clipped = np.clip(dry, -.95, .95) * gate
    top_cut = signal.ellip(10, .2, 70, CUTOFF_HZ, fs=SR, output="sos")
    return signal.sosfilt(top_cut, clipped)


dry = scene()
out = record(dry)
wav_record(out)
```